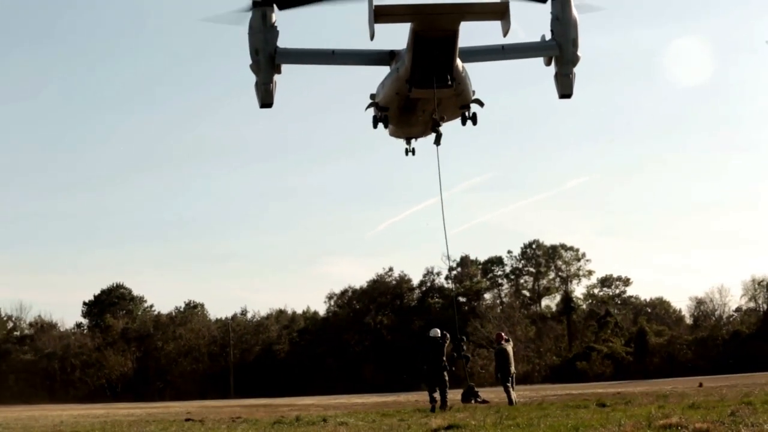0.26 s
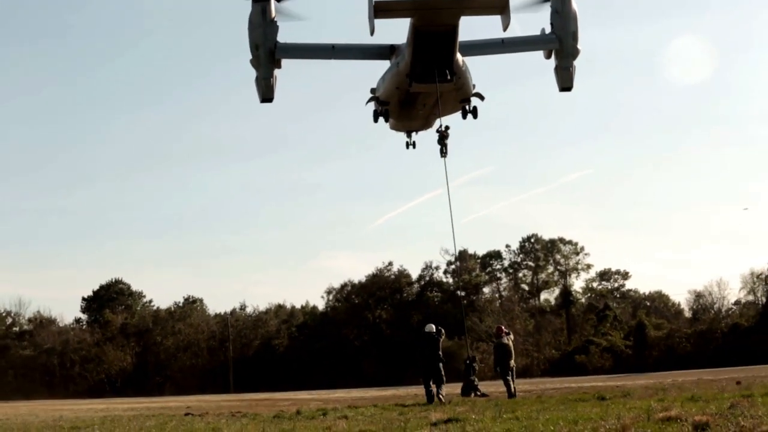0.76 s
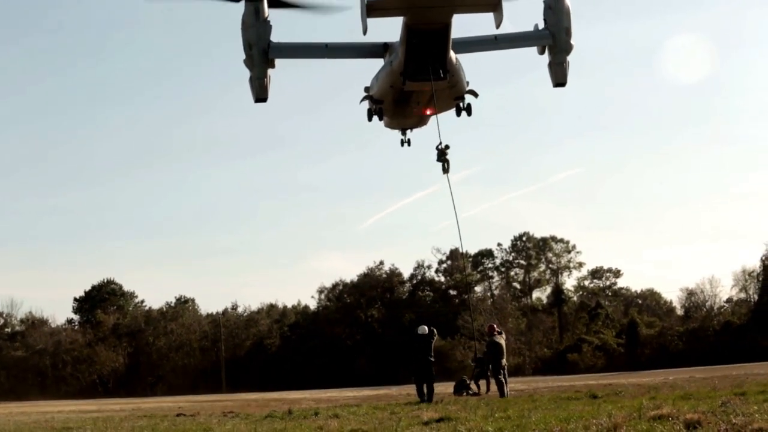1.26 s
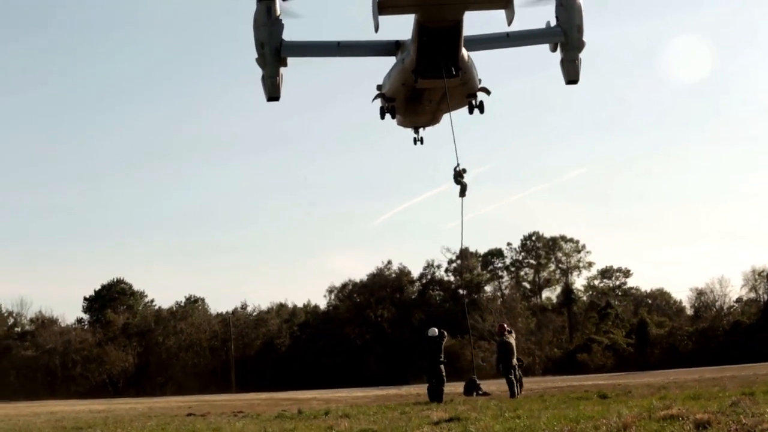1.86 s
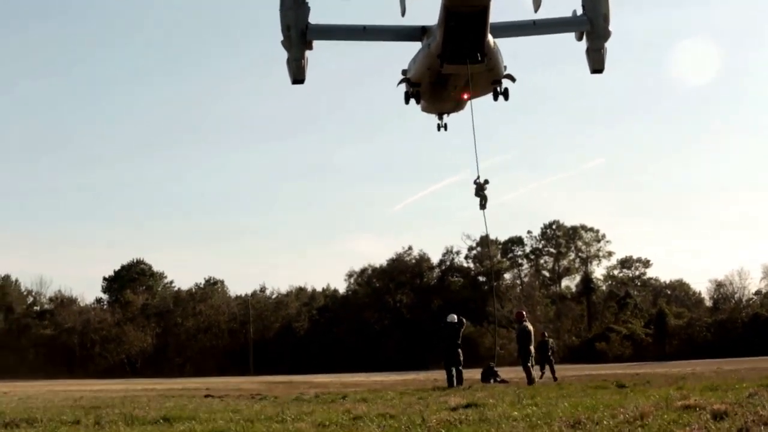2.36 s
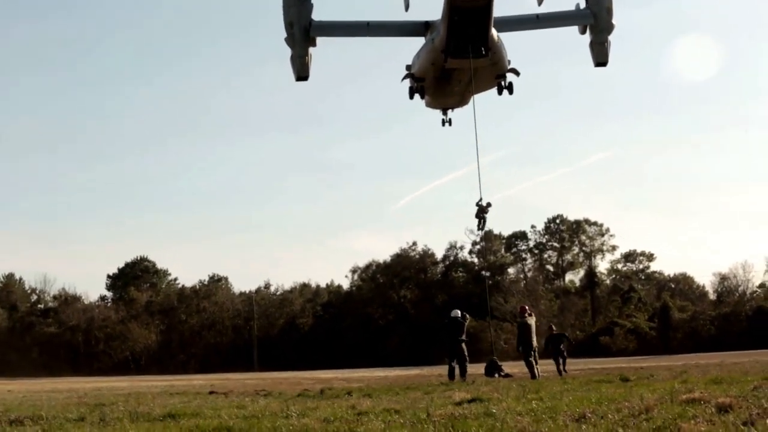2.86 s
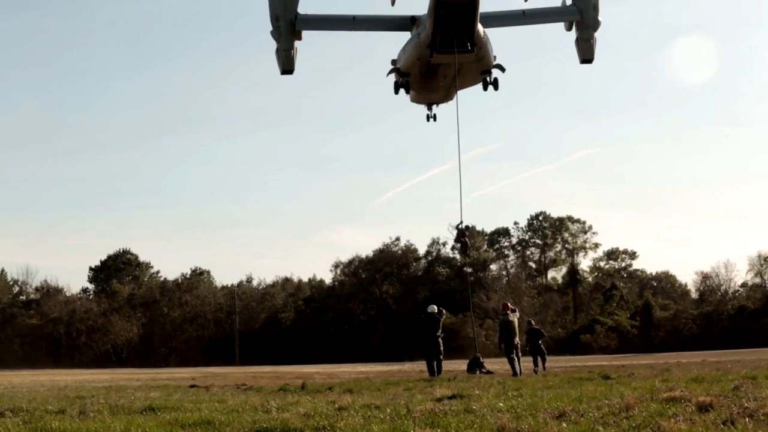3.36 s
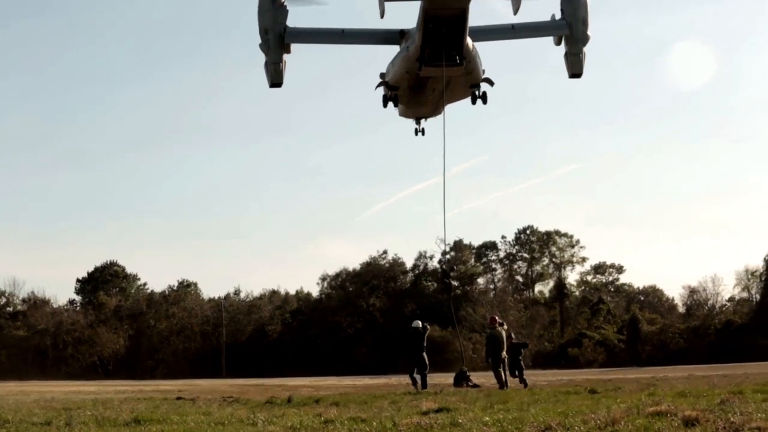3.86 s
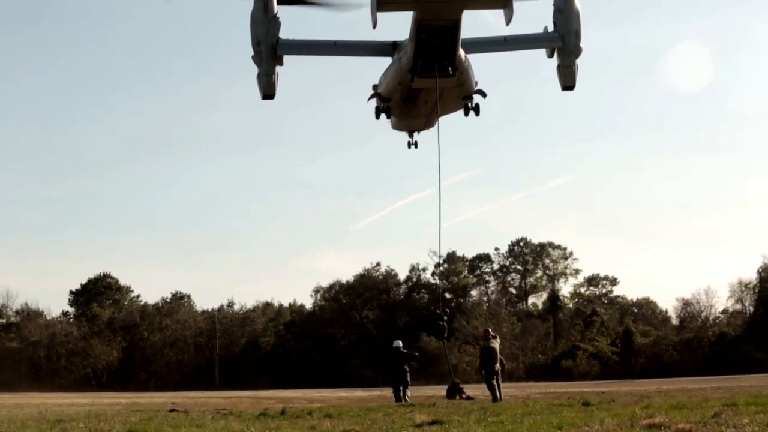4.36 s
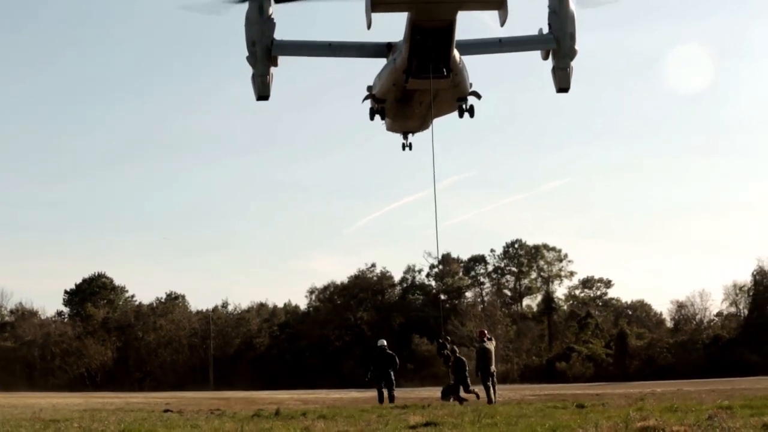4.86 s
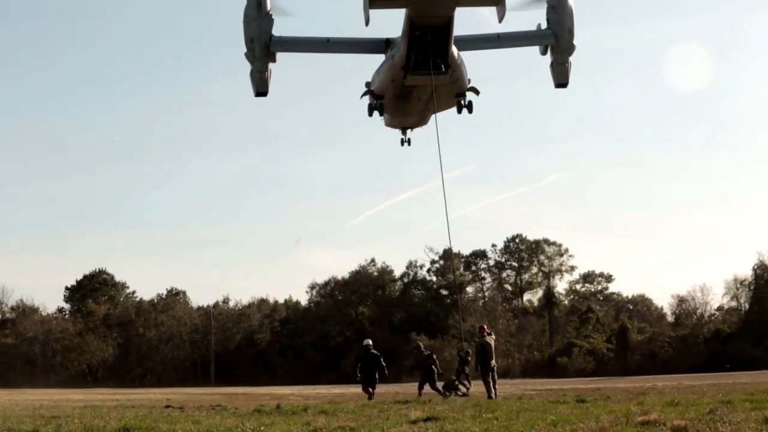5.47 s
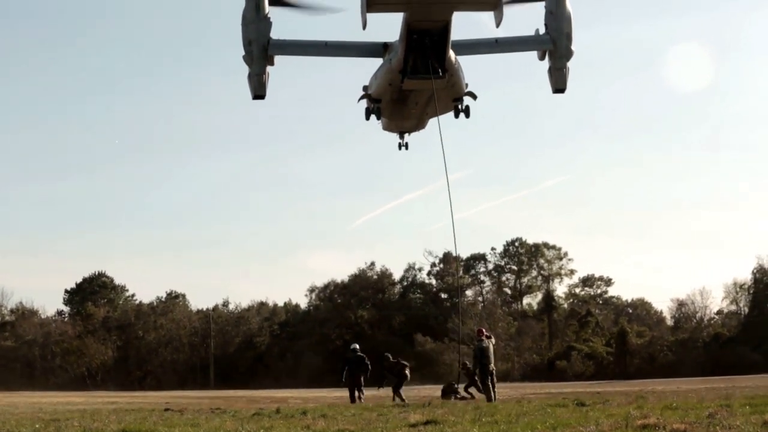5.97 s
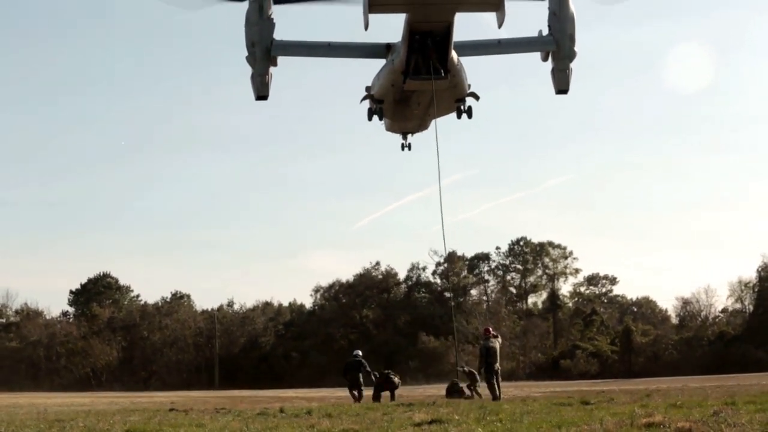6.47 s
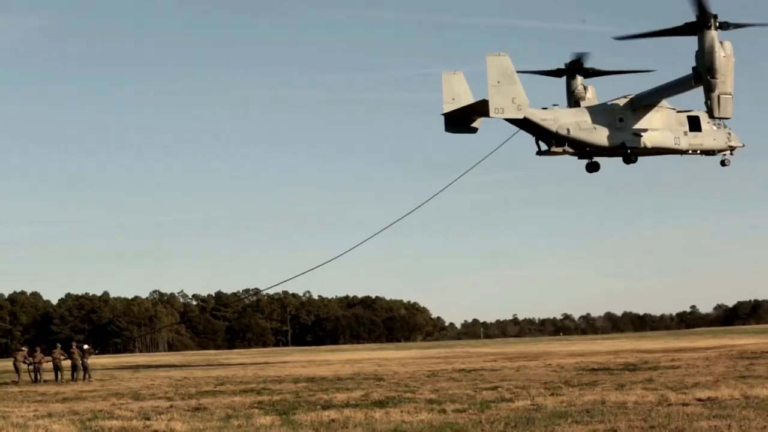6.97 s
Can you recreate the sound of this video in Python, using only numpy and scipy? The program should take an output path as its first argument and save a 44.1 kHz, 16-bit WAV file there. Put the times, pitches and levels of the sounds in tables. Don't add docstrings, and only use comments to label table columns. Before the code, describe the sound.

Heavy, continuous rotor chop from a big hovering twin-rotor aircraft, with uneven sharp cracks and breathy engine roar, changing tone as the view moves sideways.

```python
import sys
import numpy as np
from scipy import signal
from scipy.fft import rfft, irfft
from scipy.io import wavfile
from scipy.ndimage import uniform_filter1d, map_coordinates

SR = 44100
rng = np.random.default_rng(int(sys.argv[2]) if len(sys.argv) > 2 else 0)


def store_wav(level_fs):
    pcm = np.round(np.clip(np.atleast_2d(level_fs), -1, 1) * 32767)
    wavfile.write(sys.argv[1], SR, pcm.T.astype(np.int16))


def boost_factor(decibels):
    exponent = np.asarray(decibels, float) / 20
    return 10 ** exponent


N = 318402
PASS_HZ = 20.54
MOVE_S = 6.67
SPAN, LEAD = 2048, 700
USUAL_EXHAUST_DB = -36

# (time [s], crack level [dB], edge level [dB])
SHOCKS = [(0.6168, -33, -57.0), (0.6666, -31.5, -56.0), (0.7159, -32.0, -58.0), (0.815, -30, -59.0),
          (0.9143, -32, -60.0), (0.9567, -33, -59.0), (1.106, -29.5, -51.0), (1.1563, -29, -53.0),
          (1.545, -37, -62.0), (1.5926, -26, -57.0), (1.6412, -32, -58.0), (1.6902, -28, -43),
          (2.2719, -33, -58.0), (2.3695, -39, -61.0), (2.5653, -27, -59), (2.6128, -35, -60.0),
          (2.7071, -39, -61.0), (2.809, -32.0, -65.0), (2.8576, -28, -49.0), (2.9068, -39, -55.5),
          (2.9528, -45, -48), (3.0029, -39.0, -63.0), (3.1014, -37, -50), (3.1508, -34, -55.5),
          (3.1989, -27.5, -50.0), (3.2961, -45, -52.0), (3.3445, -46, -65.0), (3.4438, -42, -59.0),
          (3.4921, -45, -58.0), (3.6873, -39.0, -56.0), (3.7366, -46, -62.0), (3.8295, -33, -61.0),
          (3.8806, -32, -63.0), (3.9293, -34, -44.0), (3.978, -22, -48), (4.0268, -26.5, -48.0),
          (4.0753, -38.0, -60.0), (4.1239, -42, -60.0), (4.174, -31.5, -60.0), (4.318, -31.0, -53),
          (4.6136, -33.0, -62.0), (4.6624, -31.5, -58.0), (4.8548, -32, -47), (4.904, -40, -55.0),
          (5.0994, -25, -57), (5.1983, -32.5, -56.0), (5.6349, -35, -55.0), (6.1224, -33, -59),
          (6.6578, -37.0, -54.5), (6.7968, -30.0, -53), (6.8961, -29.0, -58.0), (6.9447, -34, -59.0),
          (6.9938, -31, -60.0), (7.0911, -28.0, -61.0)]
# (time [s], downwash level [dB], exhaust level [dB])
ROAR = [(0, -30.5, -32), (.3, -32.5, -28), (.55, -33, -31.5), (.86, -33.5, -38), (1.05, -41, -38),
        (1.47, -34.5, -36), (1.81, -38.5, -38), (2.2, -33.5, -35.5), (2.4, -37, -37.5), (2.99, -43.5, -42),
        (3.58, -43.5, -40.5), (4.34, -39, -36), (4.97, -36.5, -34), (5.4, -37.5, -34.5), (5.93, -35, -32.5),
        (6.6, -40, -33.5), (6.87, -32, -37), (7.22, -40, -39.5)]
# (time [s], blade load [dB], vortex strength [dB], centre of the thump [Hz])
BLADE = [(0, -22, -28, 235), (.46, -26, -38, 184), (.64, -22, -25.5, 243), (1.11, -22.5, -29, 204),
         (1.33, -21, -25.5, 246), (1.63, -29, -20, 208), (1.87, -26, -24, 240), (2.11, -22.5, -34, 188),
         (2.5, -25, -27, 205), (2.93, -27.5, -27.5, 240), (3.74, -24, -25.5, 232),
         (3.88, -27.5, -23.5, 244), (4.89, -29, -27.5, 191), (5.33, -27.5, -27, 216), (6.2, -26, -27, 238),
         (6.4, -17, -26.5, 245), (6.62, -21.5, -36, 247), (7.22, -39, -34, 213)]


def unit(x):
    return x / np.sqrt(np.mean(x ** 2, axis=-1, keepdims=True) + 1e-20)


def along(points, hz):
    f, v = np.transpose(points)
    return np.interp(np.log(hz + 1), np.log(f + 1), v)


def curves(rows):
    s, *columns = np.transpose(rows)
    return [np.interp(np.arange(N) / SR, s, column) for column in columns]


def wobble(rate):
    knots = rng.standard_normal(int(N * rate / SR) + 4)
    return map_coordinates(knots, [np.arange(N) * rate / SR])


def from_side():
    return np.arange(N) >= MOVE_S * SR


def causal(spectrum, stretch, lean=1):
    hz = np.fft.rfftfreq(SPAN, 1 / SR) / np.reshape(stretch, (-1, 1))
    cepstrum = irfft(np.log(boost_factor(along(spectrum, hz))), SPAN)
    cepstrum[:, 1:SPAN // 2] *= 2
    cepstrum[:, SPAN // 2 + 1:] = 0
    log_response = rfft(cepstrum)
    return np.exp(log_response.real + 1j * lean * log_response.imag)


def placed(rows, spectrum, seconds, db, stretch=1, lean=1):
    coloured = irfft(rfft(rows) * causal(spectrum, stretch, lean), SPAN)
    coloured = unit(coloured) * np.sqrt(660 / SPAN)
    at = np.round(seconds * SR).astype(int)[:, None] + np.arange(SPAN)
    pulses = coloured * boost_factor(db)[:, None]
    return np.bincount(at.ravel(), pulses.ravel(), N + 2 * SPAN)[LEAD:LEAD + N]


def hump(rise, fall, shift=0.):
    t = (np.arange(SPAN) - LEAD) / SR - shift
    return np.exp(np.where(t < 0, t / rise, -t / fall))


def puff(count, rise, fall):
    return rng.standard_normal((count, SPAN)) * hump(rise, fall)


def passes():
    # (time [s], lead [passes])
    rotor_lead = [
        (0, .2),
        (.5, .26),
        (3, .28),
        (6.665, .24),
        (6.67, .44),
        (7.22, .36),
    ]
    return PASS_HZ * np.arange(N) / SR + curves(rotor_lead)[0]


def beats():
    count = passes()
    return np.searchsorted(count, np.arange(1, int(count[-1]) + 1))


def steep_shocks():
    s, crack_db, edge_db = np.transpose(SHOCKS)
    return s[(crack_db > -31.5) | (edge_db > -54.5)]


def strengths():
    # (time [s], thump [dB], slap [dB], snap [dB])
    square_hits = [(0.5698, -25.5, -22.5, -24.5), (.6675, -29, -21, -25), (.7162, -23, -27, -25.5),
                   (0.764, -31, -22.5, -26.5), (0.909, -25, -21.5, -28), (.9606, -22.5, -18.5, -29),
                   (1.0112, -20, -24.5, -30), (1.3526, -28, -22.5, -30.5), (1.5455, -23, -22, -24),
                   (1.5934, -25.5, -22, -27), (1.6907, -24, -22.5, -30.5), (1.9835, -20, -25.5, -31),
                   (2.273, -22, -21, -24.5), (2.322, -40, -21.5, -28), (2.3707, -26, -19.5, -30),
                   (2.613, -22, -25, -24), (2.6648, -22, -23, -26.5), (2.7117, -21, -20.5, -26.5),
                   (2.76, -28, -17, -30), (2.8091, -28, -21.5, -32), (2.9523, -24, -21, -27.5),
                   (3.2968, -32, -23, -27), (3.5887, -23.5, -22.5, -31), (4.4681, -29.5, -21, -31),
                   (4.5657, -27, -21, -29), (5.0509, -28, -21.5, -31), (5.1961, -27, -23, -31),
                   (6.074, -22, -20, -28.5), (6.123, -17, -22, -32), (6.8968, -20.5, -45, -24)]
    # (time [s], thump [dB], slap [dB], snap [dB])
    stray_hits = [(0.0873, -31, -25, -31), (0.1841, -33, -28.5, -28), (0.2273, -29, -33, -32),
                  (0.3263, -24.5, -31, -26.5), (0.375, -25.0, -28, -27.5), (0.8134, -27, -28, -28),
                  (0.859, -26, -24, -24.5), (1.1058, -26, -30, -31), (1.1551, -21.5, -26, -33.5),
                  (1.2038, -27, -27.5, -32.5), (1.2997, -23.5, -32.0, -32.5), (1.6408, -21, -28, -31),
                  (1.7378, -29, -28, -32.5), (2.2249, -23, -26.0, -27.0), (2.4207, -29.5, -30, -33),
                  (2.4685, -23, -25.5, -31), (3.0533, -24.5, -32, -33), (3.3447, -43, -26, -30),
                  (3.685, -22.5, -26.5, -33.0), (3.7824, -28, -29.0, -31), (3.8805, -28.5, -26, -27),
                  (3.9291, -27.5, -30.5, -25), (4.077, -26.5, -27.5, -36), (4.124, -30, -30.5, -28),
                  (4.2736, -30, -24, -29.5), (4.3217, -33, -28, -29.0), (4.3701, -30, -28.5, -24),
                  (4.422, -28, -28, -28.5), (4.5188, -28, -25, -28.5), (4.6619, -32, -28.5, -35),
                  (4.7111, -25.5, -25, -37), (4.8045, -36, -29, -28), (4.9538, -24, -29, -28.5),
                  (5.1001, -32, -27, -36), (5.1496, -26.5, -30, -31), (5.3913, -28.5, -30, -37),
                  (5.5868, -32, -24.5, -31.0), (5.634, -26.5, -26.5, -26.5), (5.9287, -28.5, -32, -25.5),
                  (5.9758, -24.5, -23, -27.0), (6.2201, -28, -31, -35), (6.4628, -20, -24, -27),
                  (6.5118, -19.5, -25.5, -33), (6.6069, -19.5, -31, -31), (6.6559, -25.5, -34, -32),
                  (6.744, -26, -39, -31), (6.7963, -23, -39, -24), (6.8467, -39, -38, -28.5),
                  (6.9389, -49, -26, -24), (7.1407, -34, -29, -26)]
    # (time [s], thump [dB], slap [dB], snap [dB])
    further_hits = [(0.039, -25, -27.5, -26.5), (0.1329, -28, -31, -32), (0.4218, -23.5, -33, -30.5),
                    (0.4775, -27.5, -39, -27), (0.5201, -32, -25.0, -26.5), (0.6189, -23, -27, -24.5),
                    (1.2571, -30, -30.5, -30.5), (1.3988, -23.5, -24, -34.5), (1.4463, -25, -28.5, -33),
                    (1.4963, -32, -28, -29.5), (1.8324, -34, -29.5, -38), (1.884, -25.5, -28, -31.5),
                    (1.9343, -24.0, -30.0, -35), (2.032, -22, -28, -31.5), (2.1286, -25.0, -42, -31),
                    (2.5174, -22, -29.0, -33), (2.5666, -23.5, -23.5, -30.5), (2.857, -26.5, -27.5, -28),
                    (3.007, -26.5, -30.0, -33), (3.1021, -29.5, -24.0, -28.5), (3.1496, -28.5, -26.5, -34),
                    (3.1985, -27, -25, -27.5), (3.3948, -28.5, -35.0, -36), (3.4449, -23, -25, -34.5),
                    (3.4916, -27.0, -23.5, -32), (3.5406, -26, -29, -30), (3.8341, -26, -26, -31),
                    (4.0267, -22.5, -27, -27.5), (4.1738, -25.5, -27.5, -30.5), (4.613, -28, -22.5, -31),
                    (4.9042, -27, -33.5, -29.0), (5.0018, -28.5, -29.5, -27.5), (5.3419, -28, -25.5, -32.5),
                    (5.4881, -27, -28, -28.5), (5.5366, -31, -25.5, -30.5), (5.732, -25, -26.0, -29.5),
                    (5.8743, -29, -28.5, -29), (6.2679, -24.5, -29.0, -35), (6.3161, -29, -29.0, -28.5),
                    (6.3633, -21, -29, -30), (6.4123, -22.5, -25, -27), (6.5619, -23.0, -35, -28.5),
                    (6.6961, -24, -33.0, -27), (6.9941, -32, -31, -26.5), (7.0429, -27, -25, -23)]
    scatter_db, faint_db, jitter_s = [0.5, -4, 2], -0.5, 0.001193
    at = beats()

    def nearest(s):
        return np.abs(at / SR - np.reshape(s, (-1, 1))).argmin(axis=1)

    luck = rng.standard_normal((len(at), 6))
    load_db, vortex_db, _ = curves(BLADE)
    snap_db = -31.5 + 0.2 * (curves(ROAR)[1] - USUAL_EXHAUST_DB) + 1.5 * from_side()
    db = np.array([load_db[at], vortex_db[at], snap_db[at]]).T
    skew = luck[:, 3:5] ** 2 @ [[0.86, 0.23, 0.089], [0.057, 0.71, 0.63]]
    db = db + luck[:, :3] * scatter_db - faint_db * skew
    db[nearest(np.transpose(SHOCKS)[0]), 2] += 2.5
    s = at / SR + jitter_s * luck[:, 5]
    listed = np.array([*stray_hits, *further_hits, *square_hits])
    struck = nearest(listed[:, 0])
    s[struck], db[struck] = listed[:, 0], listed[:, 1:]
    s[nearest(steep_shocks())] = steep_shocks() + .0004
    return s, *db.T


def rush(spectrum, patchy_db, echo_s):
    # (frequency [Hz], level [dB])
    side_tilt = [(100, 8), (300, 5), (500, 5), (1500, 0.5), (3000, 4.5), (3900, 11), (4200, 0), (7000, 4),
                 (9000, -1), (15000, -6)]
    # (frequency [Hz], share [1])
    grass = [(100, 0.2), (600, 0.5), (1200, 0.11), (3000, 0.015)]
    settle_s = 0.12
    hz, t, z = signal.stft(rng.standard_normal(N + 512), SR, nperseg=512)
    field = uniform_filter1d(rng.standard_normal(z.shape), 6, 0)
    field = uniform_filter1d(field, 10, 1)
    side_db = np.clip((t - MOVE_S + .02) / settle_s, 0, 1) * along(side_tilt, hz)[:, None]
    delay = np.where(t > MOVE_S, .0017, echo_s)
    turn = np.exp(-2j * np.pi * hz[:, None] * delay)
    echo = np.abs(1 - along(grass, hz)[:, None] * turn)
    gain_db = along(spectrum, hz)[:, None] + side_db + patchy_db * field / field.std()
    return unit(signal.istft(z * boost_factor(gain_db) * echo, nperseg=512)[1][:N])


def roar():
    # (frequency [Hz], level [dB])
    downwash_colour = [(20, -40), (40, -37), (90, -13.5), (200, -1), (400, -5), (800, -2.5), (1100, -6),
                       (1800, -26.5), (5000, -100)]
    exhaust_colour = [(500, -8.5), (1000, -2.5), (1500, 1), (2200, -4.5), (3000, -8), (3800, -17.5),
                      (5000, -26.5), (7000, -54), (12000, -100)]
    hiss_colour = [(2500, -14), (3900, 0.5), (4900, 3.5), (5300, 0), (6500, -2), (7400, -6), (8600, -13),
                   (9300, -13), (11000, -20), (13000, -26), (15100, -33)]
    grit_colour = [(5000, -26), (7500, -4), (9000, 0), (10500, -5), (12000, -8), (13500, -15), (15100, -24),
                   (17000, -60)]
    # (time [s], level [dB])
    intake = [(.3, -41), (.55, -42.5), (.88, -49), (1.1, -49.5), (1.8, -49), (2.24, -44.5), (2.36, -52.5),
              (2.63, -49), (2.9, -54), (3.6, -53), (4.3, -48.5), (4.66, -50), (4.95, -47), (5.6, -46.5),
              (5.95, -44), (6.15, -46.5), (6.87, -47.5), (7.22, -51.5)]
    # (time [s], level [dB])
    thrown_grit = [(0, -74), (.8, -82), (2.2, -74.5), (3, -74.5), (4.2, -71), (4.9, -69), (5.5, -66),
                   (6, -64), (6.35, -67.5), (6.65, -69), (6.9, -70), (7.22, -70)]
    downwash_db, exhaust_db = curves(ROAR)
    hiss_db = curves(intake)[0] - 2
    count = passes()
    since = (count + 0.055) % 1
    behind = (1 - np.exp(-since / 0.024)) * np.exp(-since / 0.22)
    beside = 0.66 * np.cos(np.pi * (count + 0.038)) ** 2
    swell = np.where(from_side(), beside, behind)
    grit_swell = np.cos(np.pi * (count - .12)) ** 4
    gust = wobble(4.99)
    grit_db = curves(thrown_grit)[0] + 7 * grit_swell + 1.4 * wobble(14)
    layers = [(downwash_colour, downwash_db + 9 * swell + 0.13 * gust, 2.5),
              (exhaust_colour, exhaust_db + 4 * swell + 0.5 * gust, 1.5),
              (hiss_colour, hiss_db + 5 * swell + 0.6 * gust, 1.2),
              (grit_colour, grit_db, 2.2)]
    return sum(boost_factor(db) * rush(colour, patchy_db, echo_s=0.002024) for colour, db, patchy_db in layers)


def lift():
    # (multiple [1], level [dB])
    lift_orders = [
        (2, -6.5),
        (3, -3),
        (4, -2),
        (5, -5.5),
    ]
    # (time [s], level [dB])
    lift_trim = [(0, -1), (.7, -0.5), (1.1, -3), (1.7, -1), (1.9, 2), (2.2, 0), (2.6, 4), (3, -1),
                 (3.4, -2), (3.7, 3), (4.3, -1.5), (5, 3), (5.5, 1), (6.3, -2.5), (6.7, 1.5), (7.2, -3)]
    angle = 2 * np.pi * passes()
    phase = np.where(from_side(), .5, -2.6)
    tones = sum(boost_factor(db + 0.18 * wobble(1.6)) * np.cos(order * angle + phase) for order, db in lift_orders)
    swing_db = 1.1 * (curves(ROAR)[1] - USUAL_EXHAUST_DB)
    return boost_factor(-46 + curves(lift_trim)[0] + swing_db + 4.5 * from_side()) * unit(tones)


def hollow(s):
    # (time [s], level [dB])
    left_over = [(0.0, -40), (0.5, -44), (1.0, -34), (1.5, -36), (2.0, -34.5), (2.5, -37), (3.0, -38.5),
                 (3.5, -36.5), (4.0, -38.5), (4.4, -34), (4.9, -32), (5.4, -37.5), (5.8, -36.5), (6.2, -33),
                 (6.5, -32.5), (6.9, -38), (7.22, -48)]
    # (frequency [Hz], level [dB])
    gap_colour = [(250, -29.5), (340, -4.5), (430, 2), (530, -4), (700, -26.5), (3000, -89)]
    gap_db = np.interp(s, *np.transpose(left_over)) + rng.normal(0, 1.8, len(s))
    return placed(puff(len(s), 0.0037, 0.0055), gap_colour, s - .002, gap_db)


def thump(thump_db):
    # (frequency [Hz], level [dB])
    blow_colour = [(60, -42.5), (130, -16.5), (185, 0), (230, 5.5), (285, 3), (340, -17), (520, -18.5),
                   (800, -47.5), (3000, -110)]
    push_colour = [(50, -52.5), (100, -8), (125, 0.5), (165, 1), (200, -4), (300, -18.5), (600, -104)]
    # (time [s], centre of the thump [Hz], deep push [dB])
    own_tones = [(0.036, 230, -28), (0.133, 265, -30), (0.279, 257, -28), (0.572, 237, -41),
                 (0.62, 253, -40), (0.718, 268, -36), (0.766, 272, -35), (0.815, 192, -26),
                 (0.912, 228, -32), (0.961, 230, -29), (1.01, 235, -31), (1.058, 210, -29),
                 (1.156, 208, -32), (1.204, 265, -35), (1.302, 248, -32), (1.448, 265, -34),
                 (1.545, 212, -33), (1.594, 196, -34), (1.789, 215, -36), (1.935, 230, -35),
                 (1.983, 212, -29), (2.032, 200, -24), (2.081, 197, -29), (2.13, 189, -28),
                 (2.178, 183, -33), (2.227, 191, -23), (2.276, 231, -27), (2.324, 221, -28),
                 (2.47, 212, -35), (2.519, 208, -34), (2.568, 220, -35), (2.616, 255, -33),
                 (2.665, 242, -36), (2.714, 222, -41), (2.957, 250, -40), (3.444, 254, -37),
                 (3.639, 243, -34), (3.687, 195, -32), (3.736, 235, -40), (4.028, 232, -48),
                 (4.174, 265, -40), (4.223, 260, -38), (4.71, 228, -45), (4.905, 210, -30),
                 (4.953, 199, -28), (5.732, 258, -41), (5.976, 268, -39), (6.024, 286, -46),
                 (6.073, 262, -33), (6.122, 270, -39), (6.268, 225, -36), (6.365, 229, -33),
                 (6.414, 240, -42), (6.463, 233, -36), (6.511, 245, -41), (6.609, 242, -35),
                 (6.699, 210, -37), (6.894, 251, -44)]
    usual_hz = 226
    at = beats()
    load_db, _, centre = (curve[at] for curve in curves(BLADE))

    def drifting(memory):
        fresh = rng.standard_normal((len(at), SPAN))
        return unit(signal.lfilter([1], [1, -memory], fresh, axis=0))

    own_s, own_hz, own_db = np.transpose(own_tones)
    own = np.abs(at / SR - own_s[:, None]).argmin(axis=1)
    stretch = (centre / usual_hz) ** 0.73 * boost_factor(0.35 * rng.standard_normal(len(at)))
    stretch[own] = (own_hz / 234) ** 1.01
    suction = -30. * (np.arange(SPAN) == LEAD - 130)
    pulse = suction + drifting(0.62) * hump(0.005, 0.0078, shift=-0.0036)
    blow = placed(pulse, blow_colour, at / SR - .0008, thump_db - .5, stretch=stretch)
    push_db = load_db + 0.1578 * (usual_hz - centre) - 8 + rng.normal(0, 0.3, len(at))
    push_db[own] = own_db + 1.5
    return blow + placed(drifting(0.877) * hump(0.0015, 0.0025), push_colour, at / SR - .009, push_db)


def slap(s, slap_db, snap_db):
    # (frequency [Hz], level [dB])
    body_colour = [(250, -31.5), (500, -4.5), (650, 10.5), (800, 12.5), (920, 6.5), (1020, -41),
                   (1500, -25), (6000, -100)]
    snap_colour = [(500, -20.5), (1000, 2.5), (1300, 5.5), (1800, 2), (2500, -6.5), (3500, -16),
                   (6000, -33), (10000, -61), (15000, -73)]
    # (frequency [Hz], level [dB])
    side_notch = [(700, -4), (1050, 4.5), (1300, -3.5), (1600, -6), (1900, 4.5), (2200, -2), (2700, -1),
                  (3100, -0.5)]
    scatter_s, detune = .0035, .04
    count = len(s)
    spikes = np.zeros((count, SPAN))
    steep = np.abs(s[:, None] - steep_shocks()).min(axis=1) < .01
    spread = np.clip(rng.standard_normal((count, 5)), -1.7, 1.7)
    spread = np.where(steep[:, None], np.abs(spread), spread + .1)
    lesser = np.clip(LEAD + SR * scatter_s * spread, 0, SPAN - 1).astype(int)
    np.put_along_axis(spikes, lesser, .5 * rng.standard_normal(lesser.shape), axis=1)
    gathered = 1.4 * np.clip((slap_db + 28.5) / 12, 0, 1)
    spikes[:, LEAD] = np.where(steep, -1.47, -1) - gathered
    burst = 3.35 * spikes + puff(count, 0.0012, 0.0013) + 0.44 * puff(count, 0.0043, 0.0049)
    stretch = 1 + detune * rng.standard_normal(count)
    body = placed(burst, body_colour, s - .0016 + 0.00095 * steep, slap_db, stretch=stretch, lean=.6)
    snap = 10 * spikes + puff(count, 0.0084, 0.0094)
    notch = boost_factor(np.outer(s > MOVE_S, along(side_notch, np.fft.rfftfreq(SPAN, 1 / SR))))
    return body + placed(irfft(rfft(snap) * notch, SPAN), snap_colour, s - .0005, snap_db, lean=.3)


def cracks():
    # (frequency [Hz], level [dB])
    crack_colour = [(500, -20), (1500, 10), (3000, 15), (5000, 2), (7500, -5), (10000, -15), (15500, -51),
                    (20000, -110)]
    edge_colour = [(2000, -36), (5000, -8), (8000, 0), (11000, -4), (13500, -8), (15000, -8), (16000, -50),
                   (20000, -110)]
    s, crack_db, edge_db = np.transpose(SHOCKS)
    front = -7. * (np.arange(SPAN) == LEAD)
    noise = rng.standard_normal((len(s), SPAN))
    wake = noise * (hump(0.00024, 0.00093) + 0.31 * hump(0.0019, 0.0098))
    fine_wake = noise * (hump(.0003, .0008) + .2 * hump(.001, .003))
    edge = placed(front + fine_wake, edge_colour, s - .0001, edge_db - 10.5, lean=.3)
    return placed(front + wake, crack_colour, s - .0001, crack_db - 11.5, lean=.3) + edge


def scene():
    s, thump_db, slap_db, snap_db = strengths()
    flow = roar() + lift() + hollow(s)
    return (flow + thump(thump_db) + slap(s, slap_db, snap_db) + cracks())[None]


def band_limit(x):
    return signal.sosfilt(signal.butter(12, 15230, fs=SR, output="sos"), x)


def record(dry):
    bass_cut = signal.butter(2, 33, "high", fs=SR, output="sos")
    top_cut = signal.cheby2(10, 30, 15350, fs=SR, output="sos")
    heard = signal.sosfiltfilt(bass_cut, dry, padtype="even", padlen=4000)
    heard = signal.sosfiltfilt(top_cut, heard)
    fade = np.minimum(1, np.arange(N, 0, -1) / 130)
    return band_limit(heard * fade)


dry = scene()
out = record(dry)
store_wav(out)
```